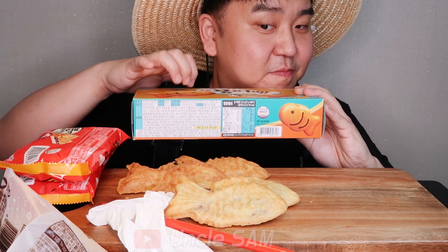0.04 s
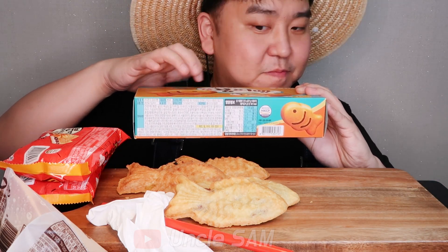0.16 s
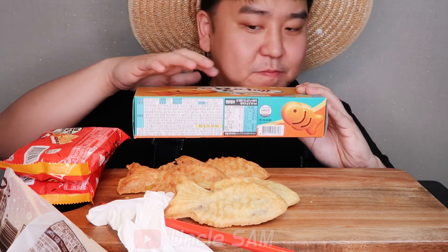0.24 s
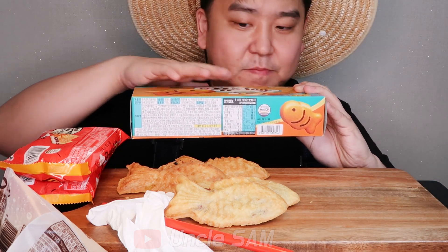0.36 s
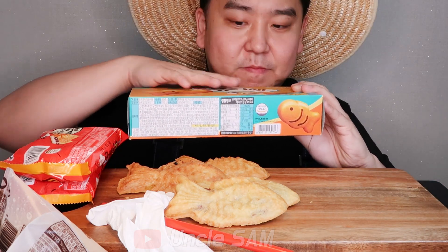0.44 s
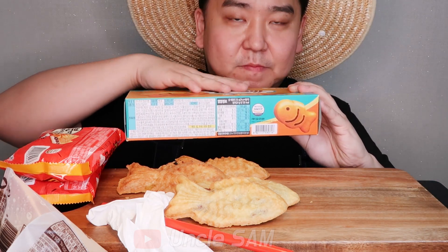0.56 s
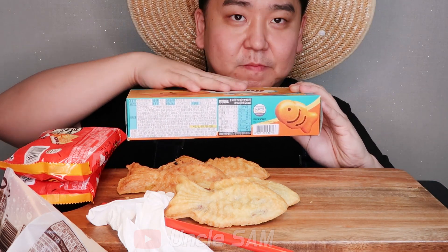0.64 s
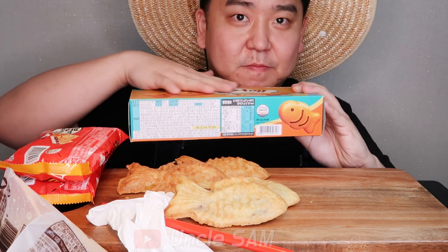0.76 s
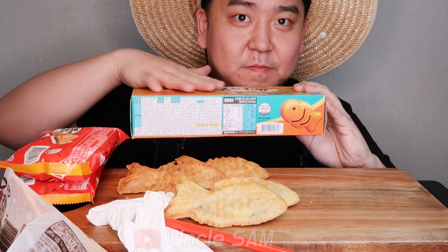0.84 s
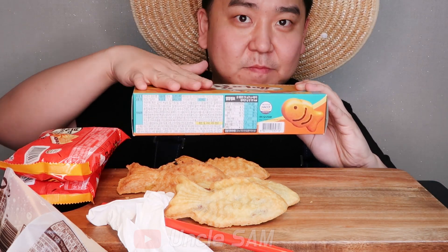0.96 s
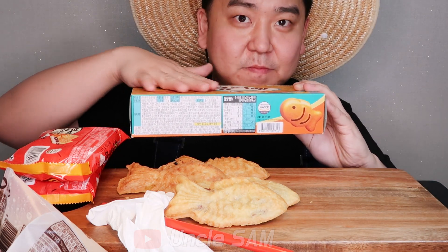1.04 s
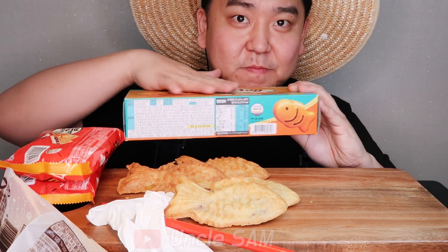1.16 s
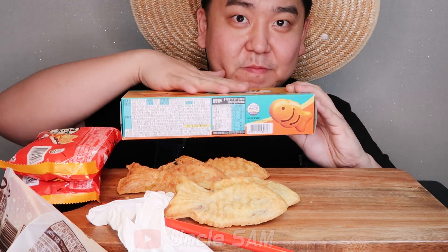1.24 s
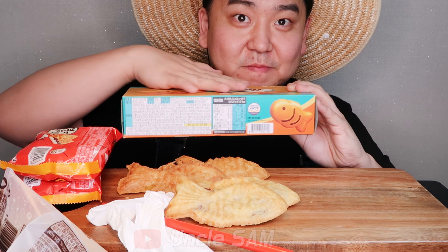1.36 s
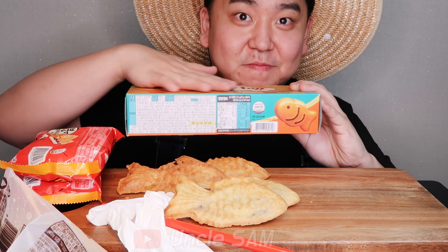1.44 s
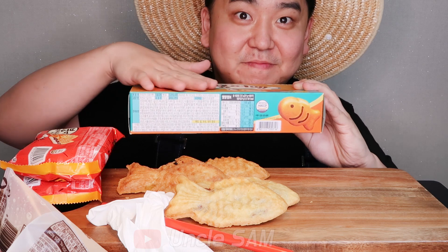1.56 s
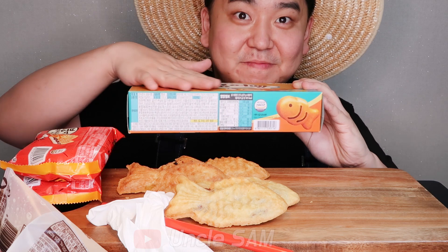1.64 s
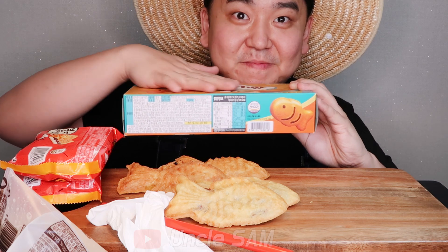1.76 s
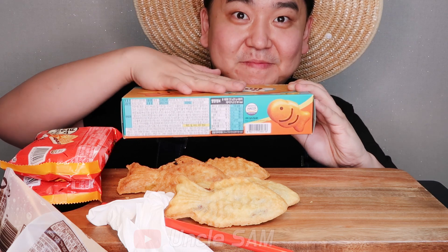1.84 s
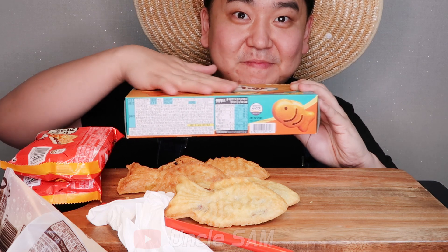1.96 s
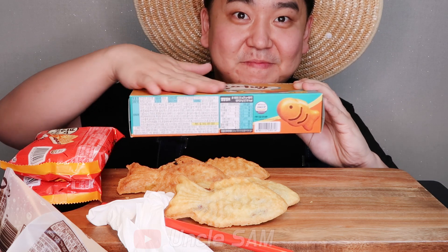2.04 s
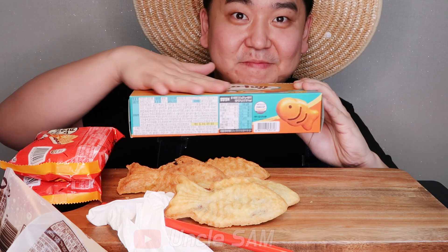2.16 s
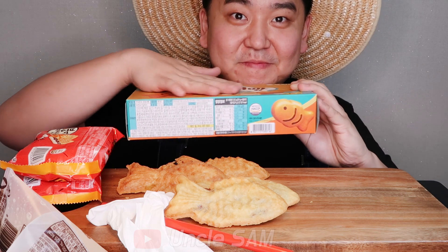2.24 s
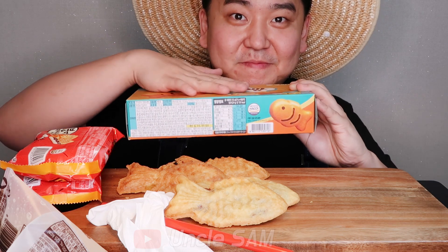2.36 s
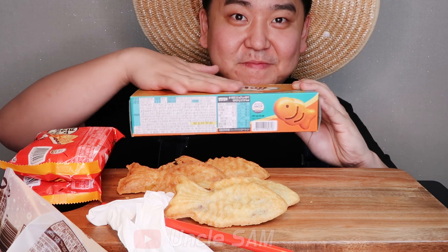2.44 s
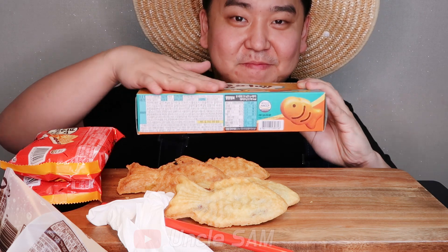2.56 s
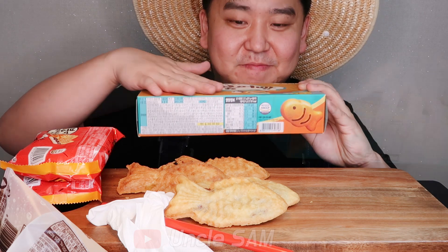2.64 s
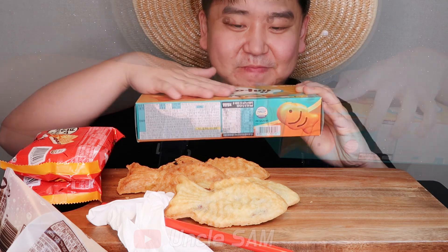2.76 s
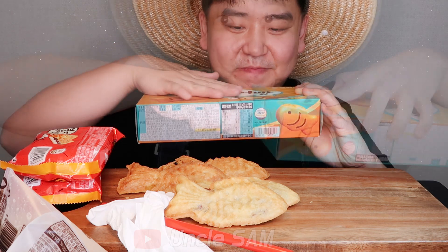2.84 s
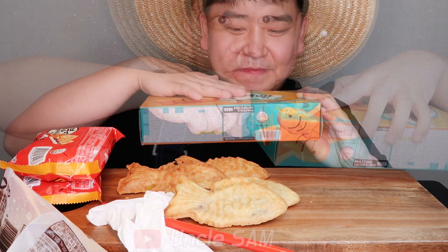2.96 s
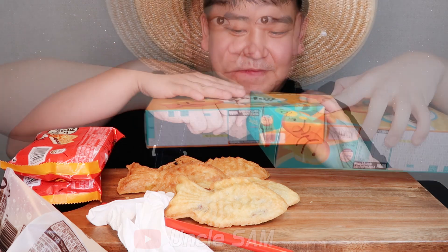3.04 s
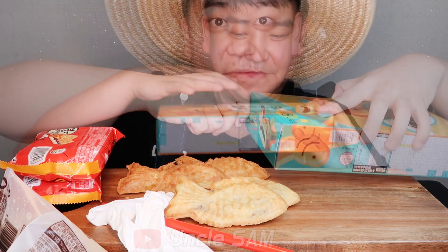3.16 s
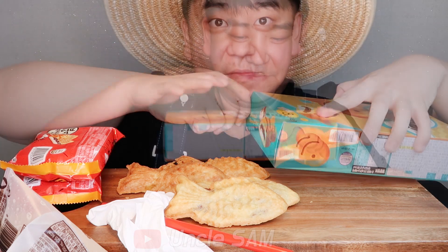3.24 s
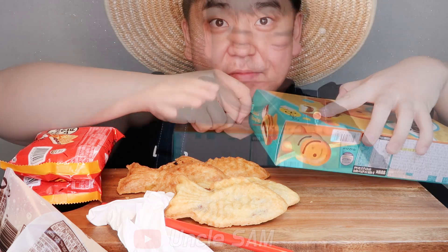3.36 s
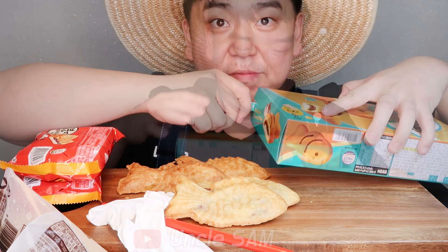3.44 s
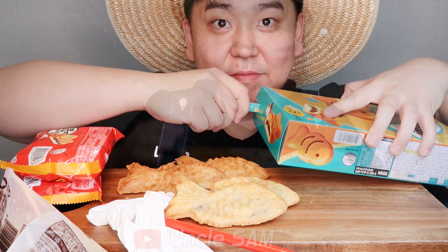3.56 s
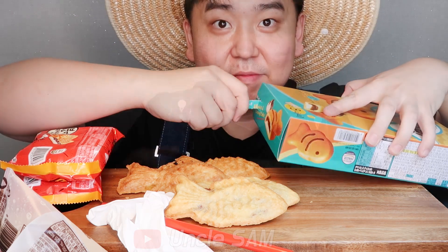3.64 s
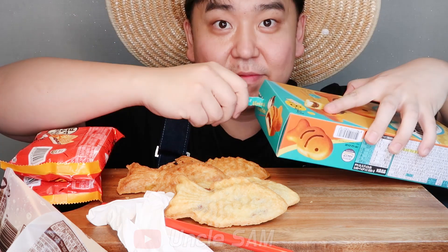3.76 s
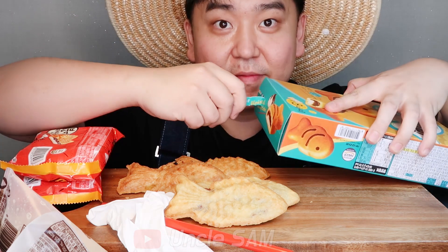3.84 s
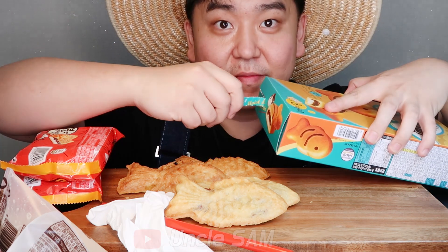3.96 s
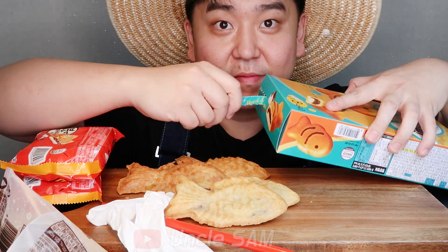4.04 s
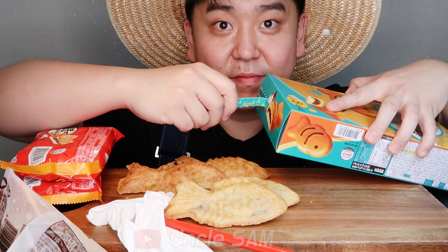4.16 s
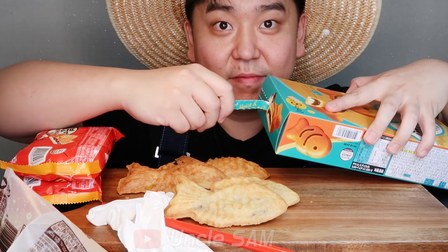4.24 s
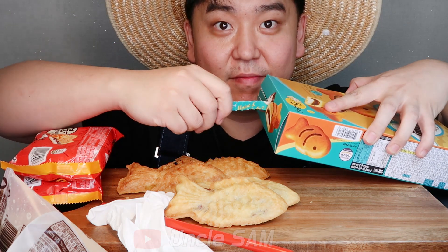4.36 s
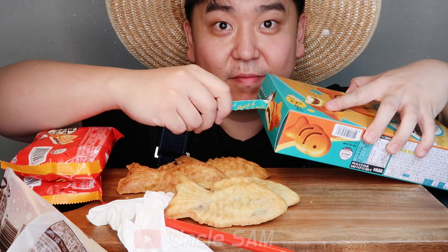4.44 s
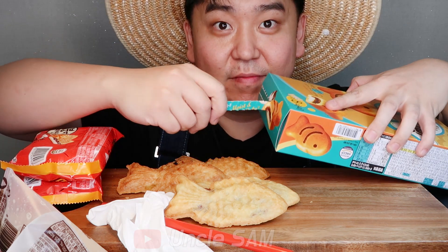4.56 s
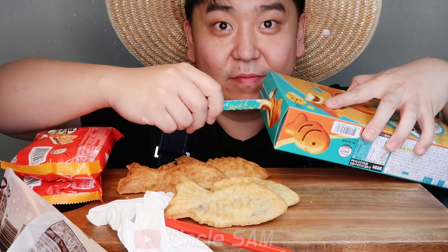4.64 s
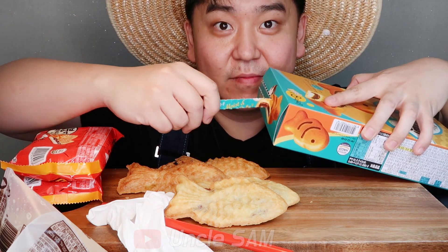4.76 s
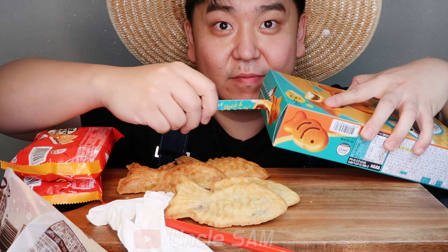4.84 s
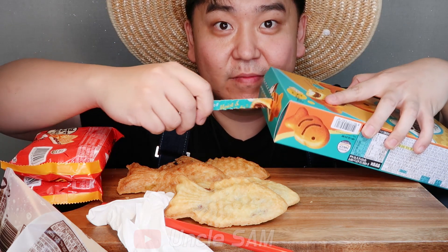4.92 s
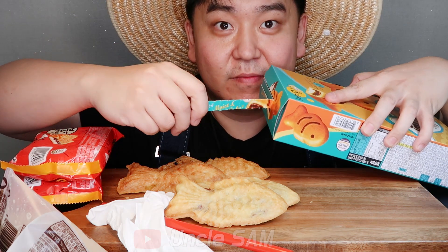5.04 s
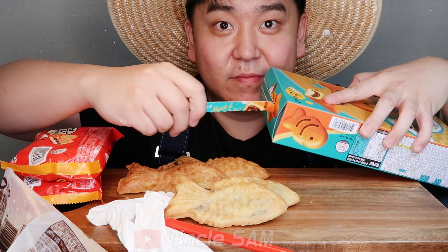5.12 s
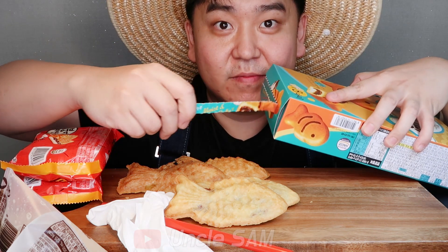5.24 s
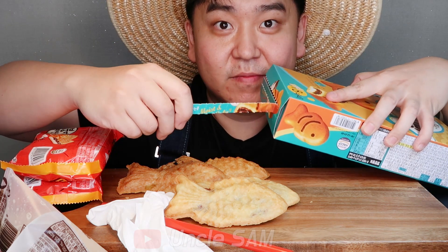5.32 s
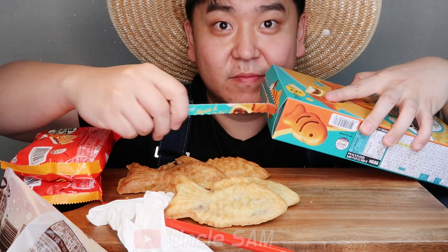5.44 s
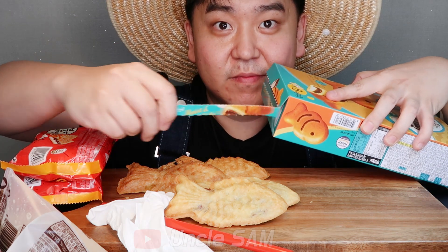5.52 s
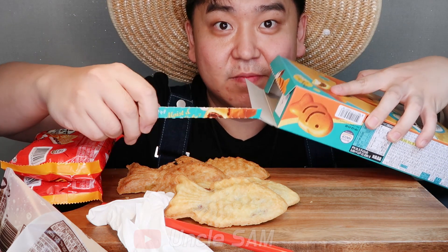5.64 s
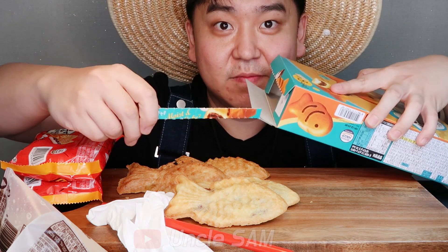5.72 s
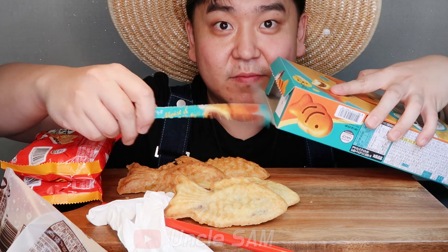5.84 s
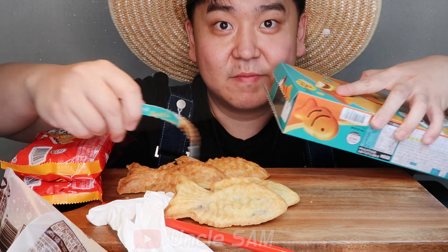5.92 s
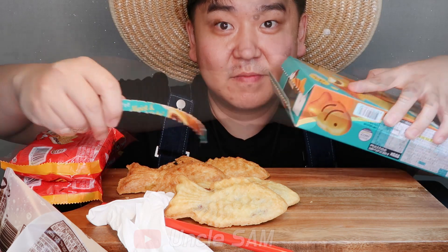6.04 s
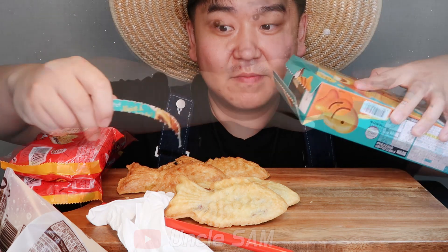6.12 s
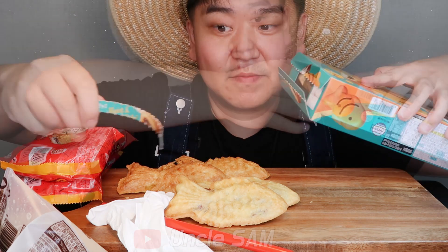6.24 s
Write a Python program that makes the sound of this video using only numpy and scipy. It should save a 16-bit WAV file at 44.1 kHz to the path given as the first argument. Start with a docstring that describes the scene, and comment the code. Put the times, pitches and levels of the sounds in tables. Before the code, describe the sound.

A close mono microphone in a small, quiet room with a low noise floor and faint hiss. At 0.03 seconds a loud knock hits a closed cardboard box, a short woody thud with quickly fading hollow tones. From about 0.5 to 3.2 seconds a palm rubs to and fro over the lid: ten soft, dry, bright swishes, faint at first and firmer after 1 second, with slight low drumming, small skin catches and faint bumps. The last stroke slows away. Around 3.4 seconds the tear strip starts to give. Until about 6.2 seconds, tugs bring irregular, crisp snaps, fibre crackle and brief crunches of peeling card, with hollow boxy resonance. The strongest cracks come near 3.9, 4.0, 4.2, 4.6, 5.25 and 5.64 seconds. After 5.8 seconds the snaps grow weaker, ending with a small hollow flap tick near 6.2.

```python
"""Rubbing and tearing open a snack box

A cardboard snack box is handled close to a mono microphone in a small room. Knocks ring the box (fading tones
and a noisy thud), then a palm rubs to and fro over the lid (tiny random slips, shaped by each stroke).
The tear strip is pulled in tugs: fibres crackle, layers peel with a crunch, and the perforations snap
one after another (noise bursts and ringing card) while the hollow box answers. Quiet room noise lies below."""
import sys
import numpy as np
from scipy import signal
from scipy.fft import rfft, irfft, next_fast_len
from scipy.io import wavfile
from scipy.ndimage import uniform_filter1d, map_coordinates

SR = 44100
rng = np.random.default_rng(int(sys.argv[2]) if len(sys.argv) > 2 else 0)


def persist_wave(psi):
    """Save psi, clipped to +-1, as 16-bit WAV."""
    counts = np.round(np.clip(psi, -1, 1) * 32767).astype(np.int16)
    wavfile.write(sys.argv[1], SR, np.atleast_2d(counts).T)


N = 277256
TIME = np.arange(N) / SR  # the whole scene [s]
LIFE = np.arange(SR // 7) / SR  # the life of one short sound [s]

# colour of the quiet room noise: (frequency [Hz], level [dB])
ROOM_NOISE_COLOUR = [(20, -51), (48, -41), (68, -0.5), (90, -14), (140, -3.5), (260, -3.5), (450, -13),
                     (750, -10.5), (1500, -15.5), (2700, -30.5), (6000, -29), (9000, -33), (16000, -34)]
# colour of the faint top hiss: (frequency [Hz], level [dB])
TOP_HISS_COLOUR = [(2500, -10), (5000, -8), (8500, -2), (12000, -4), (16000, -8)]
# how long the room's echo takes to fall by 60 dB: (frequency [Hz], time [s])
ROOM_DECAY = [(100, 0.44), (300, 0.17), (800, 0.3), (2000, 0.36), (6000, 0.36), (14000, 0.16)]
# how strongly the walls reflect: (frequency [Hz], level [dB])
WALL_REFLECTION = [(100, -9.5), (300, 3.5), (800, 1), (1800, -4), (3000, -2.5), (8000, -3), (15000, -4.5)]

# blows that shake the whole box, from a finger or a jerk of the strip: (time [s], level [dB])
BLOWS = [(0.032, 1.5), (0.34, -43.5), (0.567, -25.5), (0.68, -23.5), (0.995, -30), (1.305, -20.5),
         (1.411, -25), (2.26, -26.5), (2.585, -29), (2.781, -41), (3.04, -19.5), (3.5, -14), (4.034, -20),
         (4.196, -21), (5.638, -10.5), (5.673, -18)]
# ringing tones of the closed box: (frequency [Hz], level [dB], time to fall by 60 dB [s])
LID_TONES = [(125.6, -20, 0.13), (181, -9, 0.083), (225, -17.5, 0.15), (345, -6, 0.066), (428, -5, 0.065),
             (512, -14, 0.14), (666, -6.5, 0.056), (717.5, -4, 0.059), (888, -6.5, 0.048),
             (1033, -12, 0.042), (1550, -26, .014), (2030, -17, 0.0066)]
# colour of a fingertip's blow: (frequency [Hz], level [dB])
THUD_COLOUR = [(20, -30), (80, -26), (150, -4), (350, -9.5), (750, 6.5), (1050, -7.5), (1500, -6),
               (2100, -15), (2750, -27), (3600, -18), (6000, -27), (16000, -48)]

# the palm's strokes over the lid: (start [s], length [s], hiss [dB], speeding up [s], slowing down [s],
# fine hiss against the hiss [dB], lid drumming [dB])
PALM_STROKES = [(0.512, 0.24, -32, 0.097, 0.11, -9.5, -37.5), (0.725, 0.316, -29, 0.11, 0.079, -4.5, -31),
                (0.944, .17, -24.5, 0.073, 0.059, -7, -37.5), (1.095, 0.35, -20, 0.082, 0.056, -6.5, -34.5),
                (1.419, 0.33, -22.5, 0.12, 0.11, -7, -37.5), (1.713, 0.31, -21.5, 0.11, 0.087, -5.5, -39),
                (2.008, 0.23, -21.5, 0.043, 0.064, -6, -39), (2.219, 0.28, -20, 0.1, 0.09, -6.5, -33.5),
                (2.477, 0.31, -21.5, 0.12, 0.12, -5, -37.5), (2.739, 0.49, -20.5, 0.095, 0.3, -8, -37)]
# colour of skin on card: (frequency [Hz], level [dB])
SKIN_COLOUR = [(820, -5.5), (1400, -10.5), (1630, -13), (2400, -10.5), (2610, -9.5), (3070, -7.5),
               (3650, -1.5), (4760, -1.5), (5660, -0.5), (7150, -1), (11300, -4), (14900, -3.5),
               (15900, -14)]
# colour of the drumming lid: (frequency [Hz], level [dB])
DRUMMING_COLOUR = [(60, -48), (130, -27), (210, 0), (360, -5), (440, -2), (540, -1.5), (820, 1.5),
                   (1290, -10.5), (1700, -11), (2300, -11.5), (3700, -67)]
# the skin sticks and slips, and the lid shudders: (start [s], length [s], level [dB], resonance [Hz])
SKIN_CATCHES = [(0.653, .2, -39.5, 106), (1.286, 0.26, -40, 108), (1.959, 0.12, -36, 255),
                (2.013, 0.054, -31, 725), (2.462, .07, -35, 215), (2.58, 0.089, -35, 424),
                (3.112, 0.14, -37, 252)]

# the hand pulls the strip: (hardest moment [s], crackle [dB], gain before it [dB/s], loss after it [dB/s])
STRIP_TUGS = [(3.57, -33.5, 101, 102), (4.05, -38, 121, 70), (4.35, -38.5, 58, 120), (4.77, -33, 89, 74),
              (5.07, -34, 111, 88), (5.36, -32, 100, 149), (5.69, -38, 130, 111), (5.98, -44.5, 160, 96)]
# layers of card peeling apart: (start [s], length [s], crackle [dB], box [dB])
PEELING = [(3.729, 0.032, -29, -28.5), (4.304, 0.017, -22, -18), (4.568, 0.037, -36.5, -32),
           (4.744, 0.031, -35, -28), (4.891, 0.012, -35, -27), (5.042, 0.027, -24.5, -20.5),
           (5.404, 0.034, -33, -26.5), (5.547, 0.018, -21.5, -30), (5.615, 0.017, -24, -18),
           (5.762, 0.04, -45, -24.5), (5.964, 0.048, -42, -29)]
# perforations and creases giving way: (time [s], crack [dB], wall [Hz], wall [dB], flap [Hz], flap [dB],
# torn edge [dB], fraying against the crack [dB])
PERFORATIONS = [(3.3967, -15.5, 423, -49, 895, -34, -35, -34), (3.446, -11, 496, -20, 720, -18.5, -32, -21),
                (3.4977, -8.5, 445, -6.5, 947, -3, -25, -12),
                (3.5688, -12, 487, -32, 1190, -21, -19.5, -12.5),
                (3.6247, -6, 319, -11.5, 615, -17.5, -36, -18.5),
                (3.6431, -11, 414, -23.5, 700, -34, -25, -27),
                (3.7487, -14, 437, -26.5, 895, -30, -24, -27),
                (3.8875, -0.5, 268, -11, 610, -12.5, -18, -20), (3.939, -16, 280, -23, 1040, -24, -30, -27),
                (3.9716, -5, 253, -21.5, 885, -11, -14, -18), (4.0307, 2.5, 418, -10, 1065, -10, -10, -28),
                (4.116, -27, 432, -25, 1120, -19.5, -27, -21), (4.15, -16, 331, -48, 880, -17, -25, -8),
                (4.1629, -13, 510, -25, 840, -6.5, -15, -17), (4.1943, 3, 444, -18, 894, -12, -13.5, -23),
                (4.2929, -9.5, 284, -29, 730, -21, -20, -37), (4.3206, -3, 415, -14.5, 644, -6, -11.5, -18),
                (4.4123, -30, 530, -25, 610, -24, -47, -23), (4.5356, -24, 546, -50, 620, -39, -32, -34),
                (4.5862, -17.5, 495, -28, 638, -15.5, -25.5, -25),
                (4.6348, 3, 420, -16, 924, -11, -13, -25), (4.725, -8, 436, -27, 1330, -19, -14, -19),
                (4.7612, -0.5, 193, -24, 906, -12.5, -16, -17), (4.7955, -14, 191, -38, 900, -29, -27, -19),
                (4.898, -13.5, 465, -21, 845, -17, -20, -12),
                (4.9568, -3, 302, -20.5, 703, -15.5, -23.5, -20),
                (5.032, -16, 413, -35, 670, -39, -29, -19),
                (5.0675, -0.5, 303, -14.5, 916, -14.5, -12, -31),
                (5.138, -13, 298, -37, 888, -28, -29, -27), (5.2335, -13, 524, -30, 540, -44, -33, -27),
                (5.2456, -5, 524, -17.5, 855, -14.5, -15, -28),
                (5.2517, 3.5, 255, -19.5, 930, -22, -13.5, -33),
                (5.3369, -9.5, 303, -15, 866, -10.5, -12, -5),
                (5.3457, -0.5, 320, -18.5, 1010, -27, -25, -13),
                (5.4278, -12.5, 480, -31, 794, -18, -24, -23),
                (5.5551, -9.5, 230, -17.5, 590, -33, -21.5, -12.5),
                (5.615, -7, 300, -21, 870, -20, -16.5, -20), (5.6361, 4.5, 233, -13.5, 934, -8, -9.5, -21),
                (5.672, -5.5, 282, -19, 827, -6.5, -11, -15), (5.7412, -24, 215, -24, 870, -21, -31, -21),
                (5.7609, -15, 466, -25.5, 710, -11.5, -21.5, -26),
                (5.8706, -22.5, 455, -42, 700, -36, -31, -22),
                (5.9746, -14.5, 202, -26.5, 775, -24, -26, -13),
                (5.9982, -25, 450, -24.5, 690, -30, -30, -21),
                (6.0714, -40, 506, -44, 1120, -27.5, -43, -21), (6.132, -30, 503, -34, 910, -32, -46, -26),
                (6.181, -15, 315, -21, 780, -6, -24, -41)]
# colour of breaking card: (frequency [Hz], level [dB])
CRACK_COLOUR = [(1400, -15), (2400, -11), (3200, -1.5), (4200, -3), (6200, -2.5), (8500, 1.5), (10000, -3),
                (12300, -9), (15000, -5), (16000, -12)]
# colour of the box's broad answer: (frequency [Hz], level [dB])
BOX_COLOUR = [(50, -31), (90, -10), (130, -5.5), (200, -1.5), (330, 0), (430, -0.5), (520, 4), (700, -3.5),
              (920, 4.5), (1100, -2), (1400, -7), (1900, -7.5), (2800, -25), (5000, -71)]
# colour of the stiff torn edge: (frequency [Hz], level [dB])
EDGE_COLOUR = [(700, -20), (1300, 7.5), (1900, 2), (2600, -15.5), (4000, -32)]
# air in the box as it opens: (frequency [Hz], level [dB], time to fall by 60 dB [s])
OPEN_BOX_TONES = [(129.4, -18, 0.13), (178, -17, 0.12), (429, -14.5, 0.1), (614, -20, 0.2),
                  (688, -10.5, 0.12), (913, -13, 0.074), (1226, -15, 0.071), (1365, -23, 0.036),
                  (1870, -22, 0.043)]

TOP_HZ = 16100  # nothing is kept from here up
WHINE_DB = -68
HISS_RUB_DB, HISS_TEAR_DB = -53, -71  # top hiss until the rubbing ends, and after
TURN_SPEED = 0.075  # least share of full speed, kept as the palm turns round
SWING_PEAK = 0.43  # share of a stroke that passes before its brightest moment
FINE_GROWS_DB = 7.5  # fine hiss gained from the turn to the brightest moment
DRUM_GROWS_DB = 2  # lid drumming gained from rest to full speed
PRESS_S = 0.8  # the palm takes this long to settle its weight on the lid
LIGHT_TOUCH_DB = -7.5  # drumming at first touch, against the full weight
SHUDDER_DB, SHUDDER_HZ = -59.5, 95  # low shudder under a smoothly sliding palm
CATCH_Q = 2.6  # sharpness of every shuddering resonance
RUMBLE_DB = 2  # the box's rumble against the crackle level
WALL_CYCLES, FLAP_CYCLES = 25.3, 25.5  # cycles of the card's ring before it falls by 60 dB


def amp(db):
    """Turn decibels into a gain."""
    return 10 ** (np.asarray(db) / 20)


def unit(x):
    """Scale a sound to an rms of 1."""
    return x / np.sqrt(np.mean(x ** 2) + 1e-20)


def along(points, hz):
    """Read (Hz, value) points on a logarithmic frequency axis."""
    point_hz, value = np.transpose(points)
    return np.interp(np.log(hz + 1), np.log(point_hz + 1), value)


def curves(rows):
    """Give one value per sample for each column after the time."""
    s, *columns = np.transpose(rows)
    return [np.interp(TIME, s, column) for column in columns]


def filtered(x, response):
    """Multiply the spectrum of a sound by a response to frequency."""
    n = x.shape[-1]
    padded = next_fast_len(n + 1024)
    spectrum = rfft(x, padded) * response(np.fft.rfftfreq(padded, 1 / SR))
    return irfft(spectrum, padded)[..., :n]


def coloured(x, colour):
    """Give a sound a colour that falls away below its first point, at an rms of 1."""
    lowest_hz = colour[0][0]
    return unit(filtered(x, lambda hz: amp(along(colour, hz)) * np.minimum(hz / lowest_hz, 1) ** 2))


def hiss(colour):
    """Make a short stretch of coloured noise."""
    return coloured(rng.standard_normal(len(LIFE)), colour)


def grains(per_s, spread_db):
    """Make tiny slips at random moments with random sizes."""
    happens = rng.random(N) < per_s / SR
    size = rng.standard_normal(N)
    return happens * size * amp(spread_db * np.clip(rng.standard_normal(N), -2, 2))


def wobble(rate):
    """Make a smooth random curve through this many random points a second."""
    points = rng.standard_normal(int(N * rate / SR) + 4)
    return map_coordinates(points, [TIME * rate])


def crackle(colour, spread_db):
    """Make a short run of fibre breaks whose strength varies at random."""
    uneven = map_coordinates(rng.standard_normal(len(LIFE)), [LIFE * 900])
    sizes = amp(spread_db * np.clip(uneven, -2, 2))
    return coloured(sizes * rng.standard_normal(len(LIFE)), colour)


def fade(t60, rise):
    """Shape a soft start and an exponential decay by 60 dB in t60 seconds, with a top of 1."""
    shape = (1 - np.exp(-(LIFE / rise) ** 2)) * np.exp(-np.log(1000) * LIFE / t60)
    return shape / shape.max()


def ring(hz, t60, rise):
    """Sound one decaying tone, set off from rest."""
    return np.sin(2 * np.pi * hz * LIFE) * fade(t60, rise)


def swell(start, length, rise, fall):
    """Follow a movement that speeds up, holds and slows to rest, from 0 to 1."""
    ramp = np.minimum((TIME - start) / rise, (start + length - TIME) / fall)
    return np.sin(np.pi / 2 * np.clip(ramp, 0, 1)) ** 1.5


def add(track, s, sound):
    """Lay a sound into a track at time s."""
    start = max(round(s * SR), 0)
    track[start:start + len(sound)] += sound[:N - start]


def room(wet_db, gap=0.0044):
    """Build the direct sound and the small room's fading echo, for one place of the source."""
    hz, t, noise = signal.stft(rng.standard_normal(SR // 3), SR, nperseg=256)
    decay = np.exp(-np.log(1000) * t / along(ROOM_DECAY, hz)[:, None])
    tail = signal.istft(noise * decay, SR, nperseg=256)[1]
    # the echo builds up over about the gap [s]
    tail *= 1 - np.exp(-(np.arange(len(tail)) / SR / gap) ** 2)
    tail = tail / np.linalg.norm(tail)
    tail = amp(wet_db) * filtered(tail, lambda f: amp(along(WALL_REFLECTION, f)))
    tail[0] += 1  # the direct sound
    return tail


def rub_span():
    """Tell when the palm lands on the lid and when it leaves."""
    return PALM_STROKES[0][0], PALM_STROKES[-1][0] + PALM_STROKES[-1][1]


def background():
    """The quiet room, a faint top hiss and a thin electrical whine, all made of filtered noise."""
    quiet = amp(-50.5) * coloured(rng.standard_normal(N), ROOM_NOISE_COLOUR)
    top_db = np.where(TIME < rub_span()[1], HISS_RUB_DB, HISS_TEAR_DB)
    top_hiss = amp(top_db) * coloured(rng.standard_normal(N), TOP_HISS_COLOUR)
    # a narrow band of noise sounds like an unsteady high tone
    whine = unit(filtered(rng.standard_normal(N), lambda hz: np.exp(-((hz - 11370) / 220) ** 2)))
    return quiet + top_hiss + amp(WHINE_DB) * whine


def knocks():
    """A blow thumps the card and rings the whole box."""
    out = np.zeros(N)
    tones = sum(amp(db) * ring(hz, t60, rise=0.0011) for hz, db, t60 in LID_TONES)
    for s, db in BLOWS:
        thud = amp(-3.5) * hiss(THUD_COLOUR) * fade(t60=0.036, rise=0.00077)
        add(out, s, amp(db) * signal.fftconvolve(tones + thud, room(wet_db=-8)))
    return out


def shuddering(hz):
    """Skin that sticks and slips sends random jolts through one resonance of the lid."""
    def resonance(f):
        return (f < 3 * hz) / (1 + 1j * CATCH_Q * (f / hz - hz / (f + 1)))
    return unit(filtered(grains(per_s=360, spread_db=-2.5), resonance))


def rubbing():
    """Skin ridges slip over the card, louder with speed and brightest mid-stroke; the lid drums below."""
    lands, leaves = rub_span()
    touching = uniform_filter1d(1.0 * ((TIME >= lands) & (TIME < leaves)), size=256)
    speeds, swings, middles = [], [], []
    for start, length, hiss_level, rise, fall, fine_level, drum_level in PALM_STROKES:
        speeds.append(swell(start, length, rise, fall))
        swings.append(swell(start, length, rise=SWING_PEAK * length, fall=(1 - SWING_PEAK) * length))
        middles.append((start + length / 2, hiss_level, fine_level, drum_level))
    speed = np.maximum(np.max(speeds, axis=0), TURN_SPEED)
    swing = np.max(swings, axis=0)
    hiss_db, fine_db, drum_db = curves(middles)

    slips = coloured(grains(per_s=20000, spread_db=0.5), SKIN_COLOUR) * amp(0.12 * wobble(110))
    fine = filtered(slips, lambda hz: 1 / (1 + (9500 / (hz + 1)) ** 10))
    coarse = amp(-1.5) * unit(slips - fine)
    # the finest hiss needs a stroke in full swing
    fine = amp(fine_db + FINE_GROWS_DB * (swing - 1)) * unit(fine)
    rasp = speed * amp(hiss_db) * (coarse + fine)

    weight_db = LIGHT_TOUCH_DB * np.clip(1 - (TIME - lands) / PRESS_S, 0, 1)
    drum_db = drum_db + weight_db + DRUM_GROWS_DB * (speed - 1) + 3.7 * wobble(30.07)
    drumming = amp(drum_db) * coloured(grains(per_s=2500, spread_db=-1), DRUMMING_COLOUR)
    lid = drumming + amp(SHUDDER_DB) * shuddering(SHUDDER_HZ)
    resting = swell(lands, leaves - lands + 0.016, rise=0.16, fall=0.021)

    catching = np.zeros(N)
    for start, length, db, hz in SKIN_CATCHES:
        catching += amp(db) * swell(start, length, rise=0.02, fall=0.04) * shuddering(hz)
    return rasp * touching + catching + lid * resting


def fibres():
    """Single fibres part in clumps as each tug strains the strip, and shake the box."""
    tugs = [db - np.maximum(build * (s - TIME), relax * (TIME - s)) for s, db, build, relax in STRIP_TUGS]
    crackle_db = np.max(tugs, axis=0)
    clumps = amp(5.0 * np.clip(wobble(220), -2, 2))
    fine = amp(crackle_db - 4.5) * coloured(clumps * grains(per_s=9800, spread_db=7), CRACK_COLOUR)
    # thicker fibres let go one by one, each with a tiny burst
    breaks = np.abs(grains(per_s=150, spread_db=1))
    bursts = signal.fftconvolve(breaks, fade(t60=0.0046, rise=0.00023))[:N]
    ticks = amp(crackle_db - 0.5) * coloured(bursts * rng.standard_normal(N), CRACK_COLOUR)
    jolts = np.sqrt(clumps) * grains(per_s=2400, spread_db=-3)
    shaking = amp(crackle_db + RUMBLE_DB) * coloured(jolts, BOX_COLOUR)
    return signal.fftconvolve(fine + ticks + shaking, room(wet_db=-11.0))[:N]


def crunches():
    """Where the card splits into layers, a run of fibres goes at once and the box answers."""
    out = np.zeros(N)
    for s, length, crackle_db, box_db in PEELING:
        rise_and_fall = np.sin(np.pi * np.clip(LIFE / length, 0, 1))
        box = amp(box_db) * (hiss(BOX_COLOUR) + amp(-12.5) * crackle(EDGE_COLOUR, spread_db=-3.5))
        splitting = amp(crackle_db) * crackle(CRACK_COLOUR, spread_db=7)
        add(out, s, signal.fftconvolve(rise_and_fall * (splitting + box), room(wet_db=-8.5)))
    return out


def snaps(count=16):
    """Each bridge of card frays ever louder, cracks, and lets wall and flap spring back."""
    out = np.zeros(N)
    places = [room(wet_db=-8) for _ in range(count)]  # used in turn
    cavity = sum(amp(db) * ring(hz, t60, rise=0.0018) for hz, db, t60 in OPEN_BOX_TONES)
    for i, row in enumerate(PERFORATIONS):
        s, crack_db, wall_hz, wall_db, flap_hz, flap_db, edge_db, fray_db = row
        crack = amp(crack_db - 9.5) * hiss(CRACK_COLOUR) * fade(t60=0.011, rise=0.001)
        edge = amp(edge_db) * hiss(EDGE_COLOUR) * fade(t60=0.023, rise=0.00037)
        # card loses its motion cycle by cycle, so low tones last longer
        wall = amp(wall_db) * ring(wall_hz, t60=WALL_CYCLES / wall_hz, rise=0.0019)
        flap = amp(flap_db) * ring(flap_hz, t60=FLAP_CYCLES / flap_hz, rise=0.0015)
        broad = amp(-5.0) * hiss(BOX_COLOUR) * fade(t60=0.057, rise=0.0015)
        box = amp((wall_db + flap_db) / 2) * (cavity + broad)
        add(out, s, signal.fftconvolve(crack + edge + wall + flap + box, places[i % count]))
        fraying = amp(crack_db + fray_db) * crackle(CRACK_COLOUR, spread_db=6.0)
        fraying *= fade(t60=0.047, rise=0.00016)
        # played backwards, the decay becomes a build-up that ends just after the crack starts
        add(out, s + 0.001028 - LIFE[-1], fraying[::-1])
    return out


def scene():
    """One microphone feeds both channels."""
    sound = background() + knocks() + rubbing() + fibres() + crunches() + snaps()
    return np.array([sound, sound])


def record(dry):
    """Peaks beyond full scale are clipped; then everything from the band limit up is removed."""
    return filtered(np.clip(dry, -1, 1), lambda hz: hz < TOP_HZ)


dry = scene()
out = record(dry)
persist_wave(out)
```